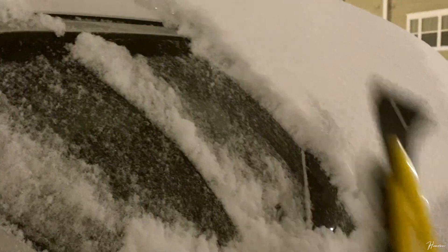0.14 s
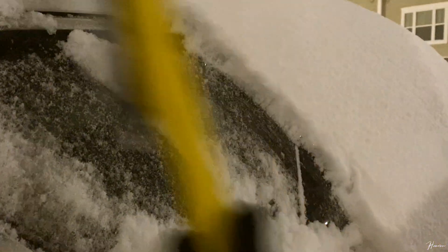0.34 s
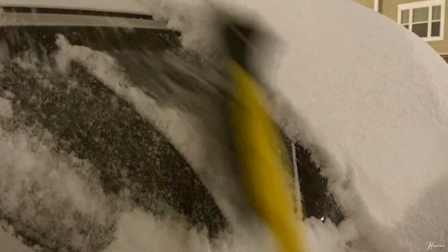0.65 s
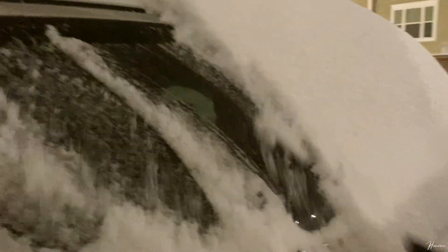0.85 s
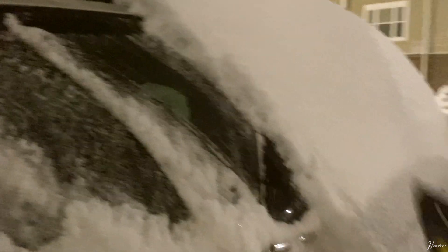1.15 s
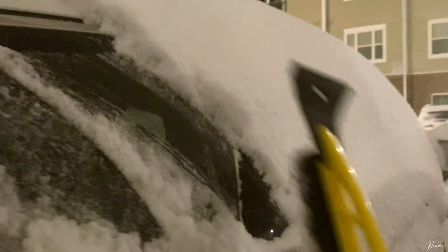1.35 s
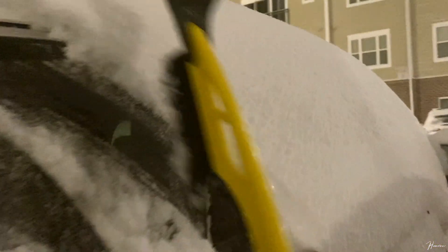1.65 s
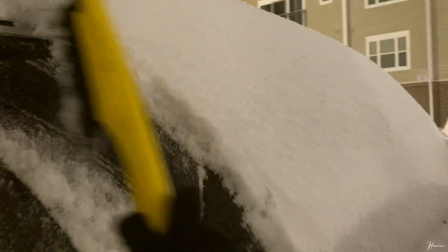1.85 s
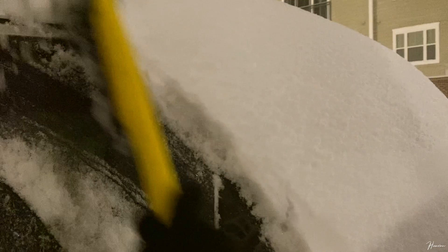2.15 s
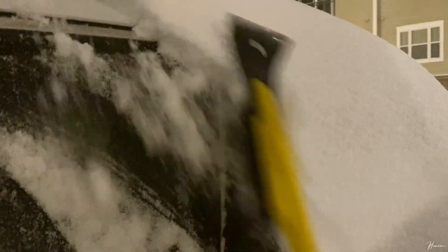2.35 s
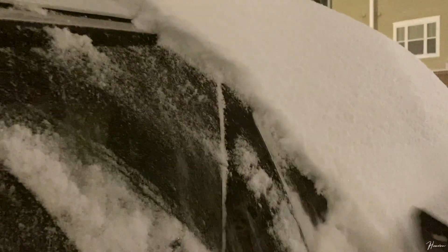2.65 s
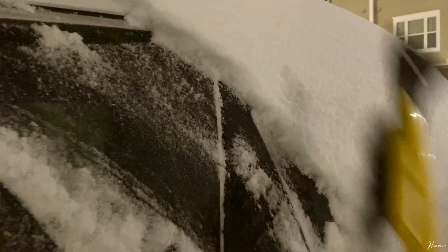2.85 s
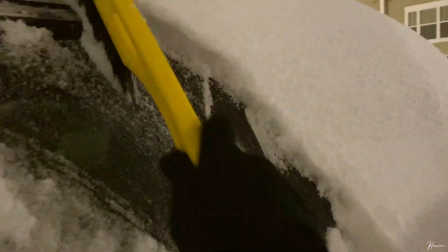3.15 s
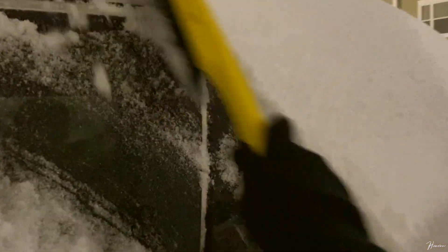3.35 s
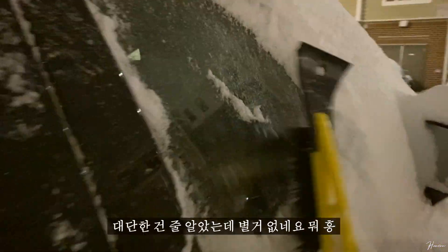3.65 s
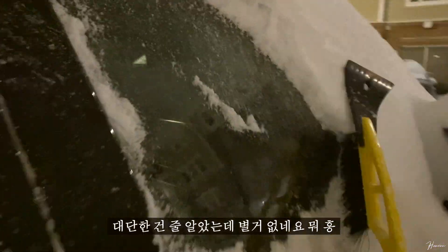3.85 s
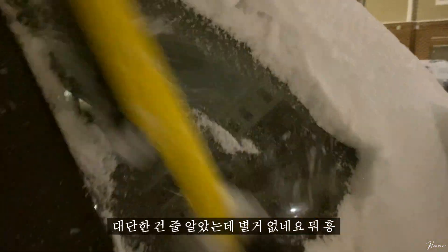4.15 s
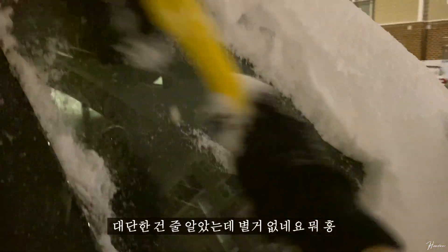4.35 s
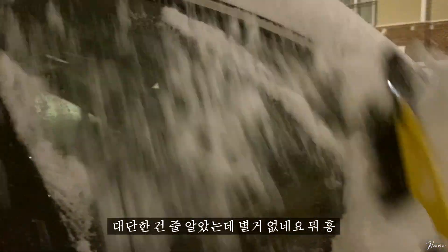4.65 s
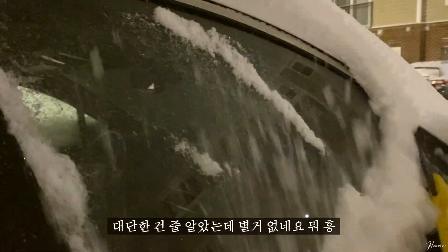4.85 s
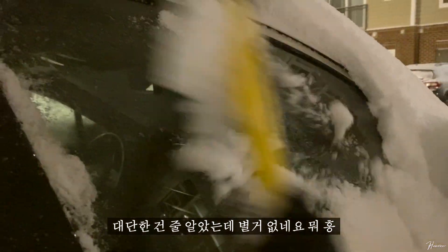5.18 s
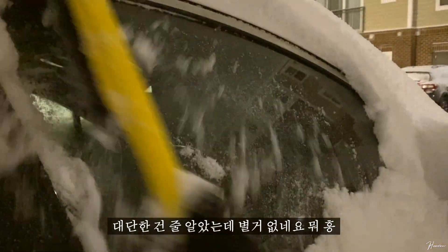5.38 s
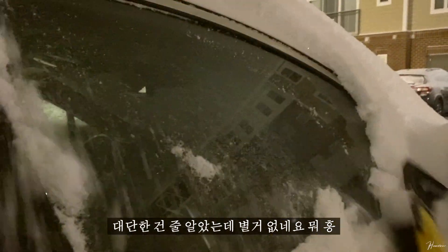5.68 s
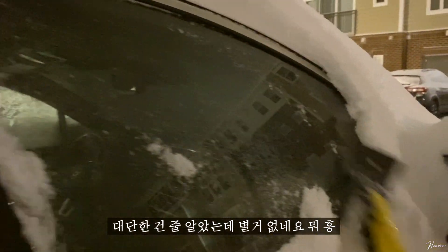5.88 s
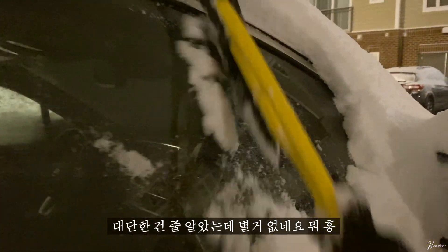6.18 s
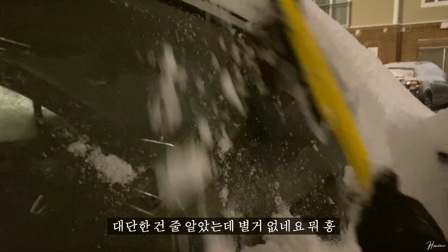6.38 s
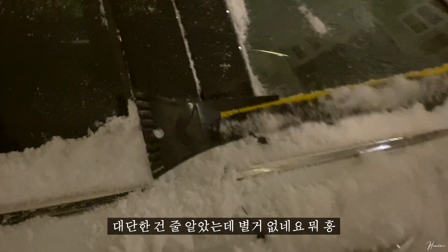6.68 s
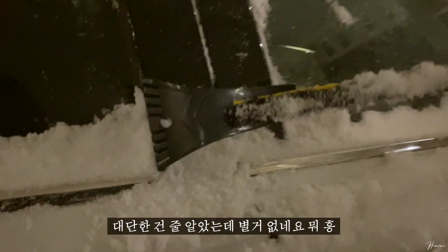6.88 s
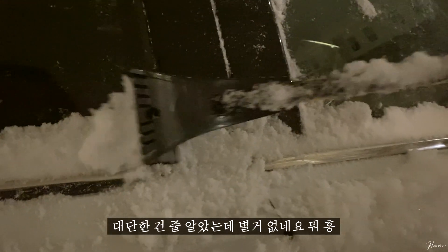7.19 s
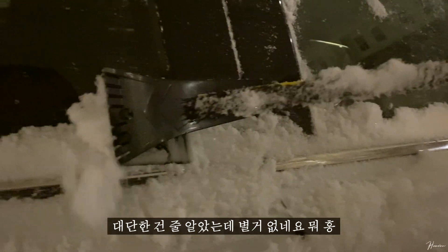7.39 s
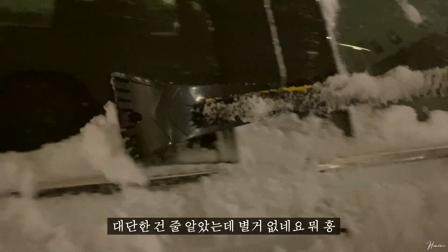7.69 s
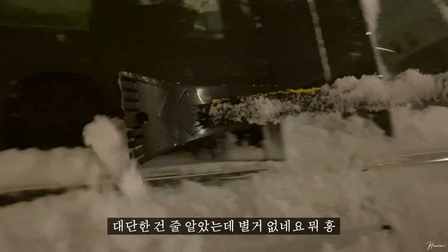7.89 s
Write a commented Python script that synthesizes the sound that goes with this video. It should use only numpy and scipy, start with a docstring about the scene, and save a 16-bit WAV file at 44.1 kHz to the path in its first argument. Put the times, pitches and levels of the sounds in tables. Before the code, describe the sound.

Close bristly swipes and hollow plastic clacks clear snow from an idling car, ending with short, crunchy scrapes on an icy sill.

```python
"""An idling car is heard first from beside the windscreen, and soon a snow brush sweeps its windows close by.
Bristles hiss as grains of noise, lumps of snow give way, and struck modes ring as the tool knocks the car.
At 3.63 s the engine cuts to its sound beside the door; it is sines at crank orders under a noisy rush.
Late on, a bare plastic blade scrapes the icy sill and crust cracks in short bursts of noise.
Gusts of low noise buffet a close pair of microphone ports."""
import sys
import numpy as np
from scipy import signal
from scipy.fft import rfft, irfft
from scipy.io import wavfile
from scipy.ndimage import uniform_filter1d

SR = 44100
rng = np.random.default_rng(int(sys.argv[2]) if len(sys.argv) > 2 else 0)


def wav_out(sig):
    """Save sig, one row per channel (or a flat mono array), as 16-bit PCM at SR to the path in sys.argv[1]."""
    wavfile.write(sys.argv[1], SR, np.round(np.clip(np.atleast_2d(sig).T, -1, 1) * 32767).astype(np.int16))


N = 353946
TIME, FREQ = np.arange(N) / SR, np.fft.rfftfreq(N, 1 / SR)  # seconds, Hz
SIDES = np.array([[.5], [-.5]])  # left and right shares of a difference between the ports

# Levels in the tables are relative where a function adds its own trim or scales the sound to rms 1.
# bristle hiss spectrum: f/Hz, level/dB per Hz
HISS_COLOUR = [(1000, -11), (4500, -14.5), (6500, -2.5), (8000, -1), (9500, 1), (10600, 0.5), (11050, 0.5),
               (11600, -1.5), (15500, -3.5)]
# swish of pushed snow, spectrum: f/Hz, level/dB per Hz
SWISH_COLOUR = [(300, -10), (1000, 2), (2800, 0.5), (4200, 2), (6500, 2.5), (8500, -24), (14000, -23)]
# body of the plastic tool, spectrum: f/Hz, level/dB per Hz
BLADE_COLOUR = [(200, -13), (480, 0), (750, -0.5), (1200, 5.5), (1700, -3), (2150, -15), (3200, -25),
                (8000, -19)]
# the blade pushing through crust: t/s, crunch level/dB, blade body level/dB
SCRAPE = [(7.1, -57.5, -60), (7.25, -58, -53.5), (7.43, -60.5, -55.5), (7.544, -52.5, -50.5),
          (7.69, -50, -48), (7.83, -50.5, -49.5), (7.89, -44.5, -48.5), (8.026, -45.5, -48.5)]


def amp(db):
    """Decibels to gain."""
    return 10 ** (np.asarray(db) / 20)


def unit(x):
    """Scales to rms 1."""
    return x / np.sqrt(np.mean(x ** 2) + 1e-20)


def read(points):
    """Reads a spectrum table on a log-frequency axis."""
    f, value = np.transpose(points)
    return np.interp(np.log(FREQ + 1), np.log(f + 1), value)


def colour(points):
    """Gain at each frequency from a dB spectrum table."""
    return amp(read(points))


def level(curve, column=1):
    """Gain over time from a dB curve, silent outside it."""
    points = np.array(curve)
    db = np.interp(TIME, points[:, 0], points[:, column], left=-np.inf, right=-np.inf)
    return uniform_filter1d(amp(db), size=300)


def add(mix, s, sound):
    """Mixes a sound in at time s."""
    part = mix[..., max(round(s * SR), 0):][..., :sound.shape[-1]]
    part += sound[..., :part.shape[-1]]


def wander(hz):
    """Slow random drift of rms 1, up to about the given rate."""
    return unit(irfft(rfft(rng.standard_normal(N)) / (1 + (FREQ / hz) ** 4), N))


def swell(s, attack_s, hold_s, release_s, edge_db):
    """Gain that rises, holds at 1 and dies away at steady rates in dB; ramps last at least 5 ms."""
    before = (s - TIME) / max(attack_s, .005)
    after = (TIME - s - hold_s) / max(release_s, .005)
    return amp(edge_db * np.clip(np.maximum(before, after), 0, 10))


def swells(rows, edge_db):
    """Adds the power of overlapping swells; gives one gain curve for each dB column."""
    shapes = np.array([swell(*row[:4], edge_db) for row in rows])
    gains = amp([row[4:] for row in rows])
    return np.sqrt(gains.T ** 2 @ shapes ** 2)


def bursts(rows, shape, offset_s):
    """Places one envelope at each row's time; gives a gain curve for each of its two dB columns."""
    out = np.zeros((2, N))
    for s, *db in rows:
        add(out, s + offset_s, amp(db)[:, None] * shape)
    return out


def port_phase():
    """Radians by which the left port leads at each frequency."""
    # left port's lead: f/Hz, phase/half turns
    phase_points = [(7400, 0), (8500, -1), (9600, -1), (10600, -2), (11650, -2), (12800, -3), (13800, -3),
                    (14800, -4)]
    return np.pi * np.interp(FREQ, *np.transpose(phase_points))


def spread(pair, gain, least=-1):
    """Blends two unrelated signals into coloured stereo of rms 1; the ports agree less off whole half turns."""
    # likeness of the two ports, clipped to +-1 below: f/Hz, correlation
    likeness = [(50, 1), (150, 0.69), (300, -0.04), (600, -0.44), (1200, -0.73), (2200, 0.44), (4000, 0.79),
                (5600, 0.33), (7000, 1), (8600, 0.95), (16000, 1.15)]
    same = np.clip(np.maximum(read(likeness), least), -1, 1)
    same = same * (1 - np.sin(port_phase()) ** 2 / 3)
    mid, side = rfft(pair) * gain * np.sqrt([1 + same, 1 - same])
    return unit(irfft([mid + side, mid - side], N))


def noise(gain):
    """Smooth stereo noise with the given spectrum."""
    return spread(rng.standard_normal((2, N)), gain)


def grains(gain, per_s, wash):
    """Many tiny slips of uneven size over a wash of smaller ones."""
    size_db = 3 * np.minimum(rng.exponential(1, N), 4)
    sizes = amp(size_db) * (rng.random(N) < per_s / SR)
    slips = unit(sizes * rng.standard_normal((2, N)))
    # the tool is close to the ports, so they are asked to agree on it more
    return spread(slips + wash * rng.standard_normal((2, N)), gain, least=0.67)


def resonate(x, hz, width):
    """A steep resonance that follows the pitch curve hz; rms 1."""
    turn = np.exp(2j * np.pi * np.cumsum(hz) / SR)
    r = np.exp(-np.pi * abs(width) / SR)
    # shift the pitch down to zero, smooth there with a double pole, and shift back
    return unit((turn * signal.lfilter([1], [1, -2 * r, r * r], x / turn)).real)


def peak(hz, width):
    """Power of one resonance across frequency, 1 at its centre."""
    return 1 / (1 + ((FREQ - hz) / width * 2) ** 2) ** 2


def brush(hiss_db=2, swish_db=-3, skid_db=-4.5, rub_db=-2, lumps_db=-4, flutter_db=1, judder_db=3.0,
          clumps_db=1.5, flex=0.13):
    """Bristles flick over snow and skate on glass; under pressure the brush judders and snow lumps give way."""
    # brush strokes: t/s at full pressure, attack/s, hold/s, release/s,
    # bristle hiss level/dB, swish of pushed snow level/dB, rub on the glass level/dB
    strokes = [(0.47, 0.18, 0.023, .03, -53.5, -57, -53), (0.528, 0.053, 0.11, 0.15, -40, -48.5, -49),
               (0.65, 0.013, 0.0083, 0.02, -56, -43.5, -37.5), (0.79, 0.045, 0.026, .04, -50, -54, -58),
               (1.88, 0.11, 0.016, 0.2, -57.5, -58, -51.5), (2.13, 0.18, 0.22, 0.096, -42, -48.5, -47),
               (2.316, 0.022, 0.028, 0.023, -47, -46, -40.5), (2.42, .05, 0.078, .1, -52, -55.5, -54),
               (3.16, 0.1, 0.21, 0.13, -56.5, -58, -56.5), (3.378, 0.11, 0.011, .12, -41.5, -47.5, -43),
               (3.52, 0.27, 0.12, 0.22, -55, -54, -51.5), (3.985, 0.12, 0.056, 0.58, -47.5, -54.5, -57.5),
               (4.22, 0.15, 0.044, 0.19, -48.5, -48.5, -58), (4.245, .03, 0.014, .025, -47, -50, -63),
               (4.35, 0.23, 0.04, 0.1, -46.5, -52, -50.5), (4.44, 0.15, 0.098, 0.12, -45.5, -49.5, -57),
               (4.62, 0.055, 0.091, 0.11, -57.5, -67, -54.5), (5.17, 0.1, 0.083, 0.083, -47, -51, -71),
               (5.21, 0.099, 0.046, .025, -49, -52, -69), (5.385, 0.079, 0.043, 0.23, -44, -53, -55),
               (5.605, 0.088, 0.039, 0.069, -53.5, -53, -53.5), (6.18, 0.044, 0.14, .05, -47, -51, -48),
               (6.305, 0.051, 0.17, 0.019, -42.5, -49, -49.5), (6.355, .015, 0.073, 0.048, -44, -44, -60)]
    # loose snow trickling down the glass: t/s, attack/s, hold/s, release/s (negative: shortest), level/dB
    loose_snow = (3, -1, 4.5, -11.5, -67.5)
    # resonances of the brush as it rubs: f/Hz, width/Hz, level/dB
    rub_modes = [(458, 240, -7), (830, 390, -4.5), (1435, 750, -5), (2300, 1320, -5)]
    # lumps of snow giving way, spectrum: f/Hz, level/dB per Hz
    clump_colour = [(200, -8), (450, 3.5), (950, -0.5), (1500, -3), (2300, -3), (3300, -12), (8000, -32)]
    edge_db = -21.5  # one attack before and one release after a hold
    bristles, snow, pressure = swells(strokes, edge_db)
    trickle = swells([loose_snow], edge_db)
    hiss = amp(hiss_db) * np.hypot(bristles, trickle) * grains(colour(HISS_COLOUR), per_s=9000, wash=2.1)

    powder = colour(SWISH_COLOUR)
    slips = grains(powder, per_s=1500, wash=1.0)
    # bristles skating on the glass sing in a drifting band
    skid = resonate(slips, 4560 * (1 + 0.081 * wander(4.3)), width=1700)
    pushed = amp(swish_db) * grains(powder, per_s=4300, wash=1) + amp(skid_db) * skid
    swish = amp(clumps_db * wander(9.0)) * snow * pushed

    drag = grains(powder, per_s=8000, wash=1.18)
    bend = 1 + flex * wander(12)
    rub = 0
    for hz, width, db in rub_modes:
        judder = judder_db * np.tanh(wander(44))
        rub = rub + amp(rub_db + db + judder) * resonate(drag, hz * bend, width)
    lumps = amp(lumps_db) * grains(colour(clump_colour), per_s=300, wash=0.57)
    return (hiss + swish) * amp(flutter_db * wander(32)) + pressure * (rub + lumps)


def flicks(hiss_db=-9, swish_db=-13, body_db=-1):
    """Bent bristles spring free in a bright puff and jolt the tool."""
    # bristles flicking off an edge: t/s, flick level/dB, tool body level/dB
    flick_rows = [(0.381, -32.5, -40), (0.389, -36, -43), (0.513, -37, -43), (0.642, -29, -42),
                  (0.7115, -31.5, -52), (1.862, -35.5, -47.5), (3.087, -35.5, -46), (3.098, -39, -46),
                  (3.346, -31.5, -52)]
    age = np.arange(SR // 10) / SR / 0.0034  # in rise times of 3.4 ms
    puff, jolt = bursts(flick_rows, age * np.exp(1 - age), 0)
    bright = amp(hiss_db) * grains(colour(HISS_COLOUR), per_s=12000, wash=1.9)
    powdery = amp(swish_db) * grains(colour(SWISH_COLOUR), per_s=3000, wash=1.6)
    return puff * (bright + powdery) + amp(body_db) * jolt * noise(colour(BLADE_COLOUR))


def edge_colour(column, floor_db=-14):
    """Spectrum of the blade's edge, from one dB column of its resonances."""
    # blade edge resonances: f/Hz, width/Hz, level/dB as it scrapes, level/dB as the crust snaps
    edge_modes = [(1440, 1100, 1, 3.5), (4070, 640, 3, 6), (5040, 900, -0.5, -3), (5970, 330, 3, 5),
                  (6700, 570, 4.5, 4.5), (8250, 560, 5.5, 3), (9050, 770, -6, 6), (9800, 580, -1, 0),
                  (12400, 590, 4, 4), (12950, 750, 6, 5), (15500, 1600, 2.5, 0)]
    peaks = sum(amp(mode[column]) ** 2 * peak(mode[0], mode[1]) for mode in edge_modes)
    return np.sqrt(peaks + amp(floor_db) ** 2)


def scraper(crunch_db=3.5, body_db=0.5, judder_db=0.2, catch_db=2):
    """The blade sticks and slips through crust, which crunches and shakes the plastic."""
    crunch = amp(crunch_db) * level(SCRAPE) * grains(edge_colour(column=2), per_s=770, wash=1.0)
    catch = amp(body_db + catch_db * wander(30))
    body = catch * level(SCRAPE, column=2) * grains(colour(BLADE_COLOUR), per_s=400, wash=1.0)
    return (crunch + body) * amp(judder_db * np.tanh(wander(90)))


def crumbs(per_s=34, crack_db=10.5, body_db=-3, spread_db=6):
    """Small snaps at random moments of the scrape, stronger as the blade bites; levels relative to SCRAPE."""
    times, crunch_db, _ = np.transpose(SCRAPE)
    chance, size = rng.random(N), rng.standard_normal(N)
    at = (chance < per_s / SR) & (TIME > times[0])
    db = np.interp(TIME[at], times, crunch_db) + spread_db * np.clip(size[at], -2, 1)
    return list(zip(TIME[at], db + crack_db, db + body_db))


def snaps(crack_db=-8, body_db=-1, break_s=0.0017, creak_s=0.006, creak_db=-17):
    """Noise swells into each break of the crust and dies after it, ringing the blade's edge and jolting its body."""
    # crust snapping under the blade: t/s at the break, crack level/dB, blade body level/dB
    snap_rows = [(6.607, -28.5, -44), (6.687, -36.5, -43), (6.87, -30.5, -35.5), (7.177, -37, -48),
                 (7.2, -29, -50), (7.247, -41, -54), (7.258, -38, -50), (7.27, -35, -38),
                 (7.2775, -29.5, -34.5), (7.362, -34, -51), (7.3715, -29, -40), (7.376, -26.5, -39.5),
                 (7.547, -29, -36), (7.571, -28.5, -39), (7.664, -37, -48), (7.78, -26.5, -45),
                 (7.813, -30, -44), (7.8485, -20.5, -33), (7.879, -24, -49), (7.916, -25, -46),
                 (7.9495, -20, -41)]
    t = np.arange(-SR // 20, SR // 20) / SR
    # the break itself, and the small fractures just before and after it
    shape = np.exp(-abs(t) / break_s) + amp(creak_db) * np.exp(-abs(t) / creak_s)
    crack, jolt = bursts(snap_rows + crumbs(), shape, t[0])
    edge = amp(crack_db) * crack * grains(edge_colour(column=3), per_s=5600, wash=1.2)
    return edge + amp(body_db) * jolt * noise(colour(BLADE_COLOUR))


def ring(modes, pitch_hz, blow, lead):
    """Damped modes struck by a blow; the left port hears them a little ahead (radians)."""
    t = np.arange(len(blow)) / SR
    phase = SIDES * lead
    tone = 0
    for ratio, db, t60 in modes:
        tone = tone + amp(db - 60 * t / t60) * np.sin(2 * np.pi * pitch_hz * ratio * t + phase)
    onset = 1 - np.exp(-t * pitch_hz * 4)  # the surface gives, with a time constant of a quarter cycle
    return unit(signal.fftconvolve(tone * onset, blow[None], axes=1)[:, :len(t)])


def knocks(panel_db=-9, shaft_db=-14, head_db=-14.5, shaft_pan_db=3, tick_db=-8, tick_s=0.0088, chatter=0.13):
    """The tool hits the car: shaft and head clack at each knock's own pitches, and the door panel answers."""
    # the tool striking the car: t/s, contact/s, door panel level/dB, its f/Hz,
    # shaft level/dB, its f/Hz, plastic head level/dB, its f/Hz
    strikes = [(0.382, 0.0014, -35, 310, -39, 830, -46, 1900),
               (0.569, 0.0024, -38, 405, -50, 784, -58, 1900),
               (0.6511, .0018, -45, 540, -35.5, 840, -38, 2020),
               (0.712, 0.00091, -52, 301, -33.5, 877, -39, 2730),
               (1.206, 0.0012, -66, 310, -58, 910, -50, 1700),
               (1.865, 0.001, -41.5, 378, -46, 850, -46, 2540),
               (2.143, 0.0038, -37.5, 398, -42, 875, -49, 2000),
               (2.18, 0.0016, -46, 390, -40, 840, -46, 1900),
               (2.257, 0.0022, -54, 326, -38, 830, -46, 2300),
               (2.284, .0015, -56, 326, -41, 950, -42, 1990),
               (2.327, 0.00085, -58, 400, -45, 850, -46, 2000),
               (2.335, 0.0022, -47, 575, -51, 820, -40, 1410),
               (2.678, .0015, -41.5, 325, -67, 850, -62, 2670),
               (2.984, .003, -35, 298, -67, 855, -64, 2000), (3.028, .0015, -47, 320, -58, 860, -64, 2000),
               (3.346, 0.0013, -55, 322, -41, 720, -37.5, 2830),
               (3.379, 0.0036, -58, 320, -48, 905, -39, 2130), (3.4, 0.0017, -31, 318, -54, 872, -49, 2000),
               (4.234, .006, -44, 350, -57, 910, -55, 1650),
               (4.342, 0.0071, -58, 350, -54, 900, -45.5, 1590),
               (5.79, 0.0023, -39.5, 323, -52, 850, -54, 1750),
               (6.218, 0.0014, -39.5, 320, -48, 624, -46, 1670),
               (6.285, 0.0013, -34.5, 398, -53, 810, -50, 1300),
               (6.555, .0015, -37.5, 308, -48, 800, -58, 1310),
               (6.607, 0.0034, -48, 428, -39, 790, -33.5, 1310),
               (6.6509, 0.00071, -29.5, 466, -36.5, 790, -39, 1200),
               (7.0577, 0.00049, -54, 422, -26, 830, -32.5, 1600),
               (7.404, 0.0024, -58, 393, -50, 900, -45, 1300),
               (7.458, .003, -37.5, 252, -60, 800, -60, 1300),
               (7.585, 0.0038, -43, 310, -60, 790, -58, 1300), (7.788, .002, -47, 424, -50, 850, -48, 1310),
               (7.985, .003, -42, 475, -57, 800, -55, 1300)]
    # modes of door panel, shaft and plastic head: multiple of its f, level/dB, t60/s
    panel_modes = [(0.63, -9, 0.18), (1, 4, 0.048), (1.28, -10.5, 0.086)]
    shaft_modes = [(1, -1, 0.044), (1.2, 4.5, 0.015), (1.48, -7.5, 0.012)]
    head_modes = [(0.8, 0, 0.0079), (1, 4, 0.016), (1.12, -15, 0.0093), (2.7, -6, 0.0083)]
    blade_from_s = 6.5  # after a cut near here the bare blade is used instead of the bristles
    t, out = np.arange(SR // 8) / SR, np.zeros((2, N))
    pan = amp(shaft_pan_db * SIDES)
    tick_band = signal.butter(1, [1500, 6000], "bandpass", fs=SR)
    for s, contact_s, low_db, low_hz, knock_db, knock_hz, clack_db, clack_hz in strikes:
        grit = rng.standard_normal(len(t))
        rattle = grit * np.exp(-t / contact_s)
        if s < blade_from_s:  # bristles land one after another
            blow = rattle * t
        else:  # the bare blade lands all at once, with a faint tick, and chatters
            blow = (t == 0) + chatter * rattle
            tick = signal.lfilter(*tick_band, grit) * np.exp(-t / tick_s)
            add(out, s, amp(tick_db + clack_db) * tick)
        add(out, s, amp(panel_db + low_db) * ring(panel_modes, low_hz, blow, lead=1.09))
        add(out, s, amp(shaft_db + knock_db) * pan * ring(shaft_modes, knock_hz, blow, lead=0.87))
        add(out, s, amp(head_db + clack_db) * ring(head_modes, clack_hz, blow, lead=0.57))
    return out


def thumps(db=-1, rise_s=0.0061):
    """Soft, low pushes that swell and die quickly, as decaying sines."""
    # dull thumps of snow and sleeve against the car: t/s, peak level/dB, f/Hz
    pushes = [(0.396, -30.5, 185), (0.963, -27, 103), (1.008, -24, 80), (1.346, -22.5, 69),
              (2.538, -13.5, 59.4), (2.677, -15.5, 85), (2.985, -21, 159), (3.044, -10, 59),
              (3.128, -13, 106), (3.397, -16, 166.4), (3.425, -9, 53.4), (6.298, -27, 77.4),
              (7.465, -20, 77), (7.766, -17.5, 82)]
    t, out = np.arange(SR // 5) / SR, np.zeros(N)
    envelope = t / rise_s * np.exp(1 - t / rise_s)
    for s, peak_db, hz in pushes:
        add(out, s, amp(db + peak_db) * envelope * np.sin(2 * np.pi * hz * t))
    return out


def wind(db=-1.5, lumpiness=0.21):
    """Eddies press on the ports; their strength follows the gusts."""
    # gusts on the ports: t/s at full strength, attack/s, hold/s, release/s, level/dB
    gusts = [(0.97, 0.07, 0.064, 0.14, -30.5), (1.25, 0.12, 0.12, 0.046, -37.5),
             (2.53, 0.13, 0.048, 0.072, -24), (2.66, 0.041, 0.24, .1, -28), (2.99, 0.024, 0.1, 0.17, -21),
             (3.29, 0.28, .29, 0.07, -25), (3.45, 0.049, 0.031, 0.03, -18.5),
             (6.52, 0.07, 0.23, 0.23, -25.5), (7.02, 0.39, 0.31, 0.092, -31), (7.46, 0.14, 0.12, 0.11, -23),
             (7.77, 0.15, 0.019, 0.043, -21), (7.89, 0.11, 0.045, 0.35, -20.5)]
    # gust spectrum: f/Hz, level/dB per Hz
    gust_colour = [(20, -15), (40, -2.5), (58, 5), (90, -4), (130, -9.5), (200, -16.5), (300, -27.5),
                   (500, -43.5), (1200, -70)]
    eddies = noise(colour(gust_colour))
    # even out the eddies' own swings, so that the gusts set the level
    strength = np.sqrt(uniform_filter1d((eddies ** 2).mean(0), size=2000) + 1e-6)
    gust_gain = swells(gusts, edge_db=-17)  # one attack before and one release after a hold
    return amp(db) * gust_gain * eddies / strength * (1 + lumpiness * wander(28))


def engine_at(turns, orders, rush, bay, hum_db, rush_db, waver, throb):
    """Orders of the crank, strongest mostly at the even firing orders; rush and bay throb twice a turn."""
    hum = 0
    for k, db in orders:
        tone = np.cos(2 * np.pi * (round(k) * turns + rng.random()))
        hum = hum + amp(db) * (1 + waver * wander(3.3)) * tone
    bay_shape = np.sqrt(sum(amp(db) ** 2 / width * peak(hz, width) for hz, width, db in bay))
    bay_gain = np.linalg.norm([amp(db) for _, _, db in bay])
    beat = 1 + throb * np.cos(4 * np.pi * turns)
    rushing = amp(rush_db) * noise(colour(rush)) + bay_gain * noise(bay_shape)
    return amp(hum_db) * unit(hum) + beat * rushing


def engine():
    """A four-cylinder engine on fast idle, with an alternator whine locked to the crank."""
    # crank speed: t/s, turns per second
    speed = [(0.0, 21.3), (1.05, 21.7), (2.23, 21.8), (2.56, 21.2), (2.92, 21.1), (3.25, 21.4),
             (3.62, 21.2), (3.64, 20.1), (5.19, 20.1), (6.26, 20.0), (7.33, 19.7), (8.0, 19.9)]
    # crank orders beside windscreen and door: multiple of crank speed, level/dB
    orders_front = [(1, -22), (2, 3), (3, -9), (4, 0), (5, -24), (6, -14), (7, -19), (8, -16), (9, -19.5),
                    (10, -25), (11, -23.5), (12, -10), (13, -25.5), (14, -16.5)]
    orders_door = [(1, -31), (2, 0.5), (3, -16), (4, -0.5), (5, -28), (6, -13), (7, -35), (8, -9),
                   (9, -13.5), (10, -12.5), (11, -30), (12, -15.5), (13, -19.5), (14, -12.5)]
    # rush of fan and belts at the two places: f/Hz, level/dB per Hz
    rush_front = [(25, -20), (90, 3.5), (180, -8.5), (290, -7), (380, -14), (550, -15.5), (1100, -22.5),
                  (2400, -30), (4500, -31), (6500, -35), (8000, -42.5), (11000, -43.5), (15500, -46)]
    rush_door = [(25, -4), (90, 1), (180, -1.5), (290, -9), (380, -11.5), (550, -14), (1100, -19),
                 (2400, -24.5), (4500, -27), (6500, -31), (8000, -36.5), (11000, -40.5), (15500, -43)]
    # ringing of the engine bay at the two places: f/Hz, width/Hz, level/dB
    bay_front = [(1788, 32, -69), (2300, 360, -64), (2670, 210, -65), (3100, 53, -73), (3525, 72, -71),
                 (3860, 89, -72), (4360, 67, -73), (4860, 110, -69.5), (6430, 150, -75)]
    bay_door = [(1510, 17, -63), (1717, 160, -62.5), (2237, 47, -67.5), (2665, 56, -63.5),
                (2804, 41, -67.5), (4760, 120, -67.5), (6600, 250, -70)]
    # alternator whine: t/s, level/dB
    whine_curve = [(0, -65), (.8, -56), (1.3, -60.5), (3.5, -63), (3.65, -53.5), (4.3, -62.5), (8, -67)]
    turns = np.cumsum(np.interp(TIME, *np.transpose(speed))) / SR
    front = engine_at(turns, orders_front, rush_front, bay_front,
                      hum_db=-32.5, rush_db=-43.5, waver=0.11, throb=0.078)
    door = engine_at(turns, orders_door, rush_door, bay_door,
                     hum_db=-36.5, rush_db=-43, waver=0.12, throb=0.091)
    door_share = np.clip((TIME - 3.63) / 0.011, 0, 1)  # cut from windscreen to door, crossfaded over 11 ms
    whine = np.sin(2 * np.pi * 120 * turns + .7 * wander(25))
    return (1 - door_share) * front + door_share * door + level(whine_curve) * whine


def scene():
    """All sources, close by in open air."""
    return brush() + flicks() + scraper() + snaps() + knocks() + thumps() + wind() + engine()


def record(dry):
    """The port pair swings in and out of phase through the treble; then bass roll-off and band limit."""
    # level difference of the ports: f/Hz, left minus right level/dB
    balance = [(130, 0), (260, 4), (500, 2.4), (1000, 0), (2000, 1.2), (4000, 1.8), (7000, 0)]
    ports = amp(SIDES * read(balance)) * np.exp(1j * SIDES * port_phase())
    low_cut = FREQ ** 2 / np.sqrt(FREQ ** 4 + 30 ** 4)
    band_edge = np.clip((15780 - FREQ) / 200 + .5, 0, 1)
    fade = np.clip(np.minimum(TIME, TIME[-1] - TIME) / .004, 0, 1)  # 4 ms at each end
    return irfft(rfft(dry * fade) * ports * low_cut * band_edge, N)


dry = scene()
out = record(dry)
wav_out(out)
```